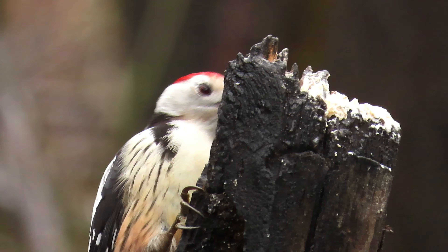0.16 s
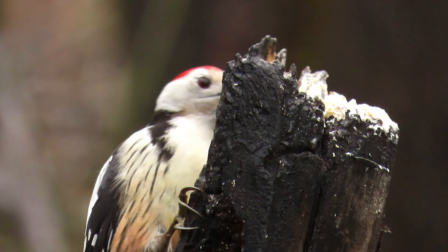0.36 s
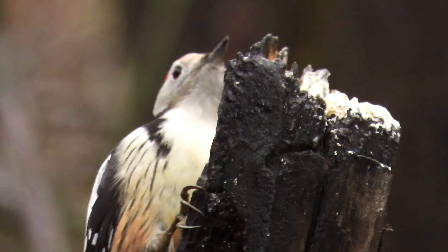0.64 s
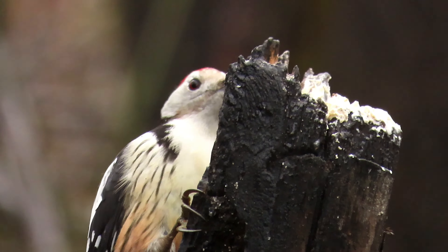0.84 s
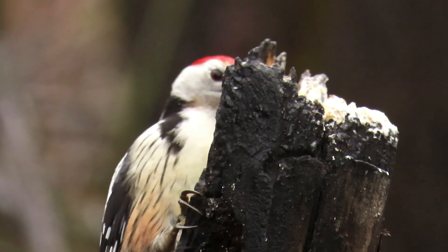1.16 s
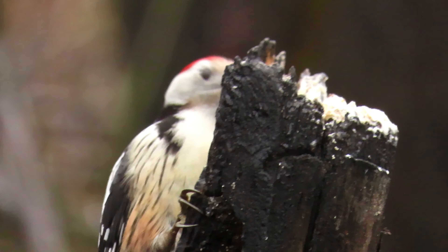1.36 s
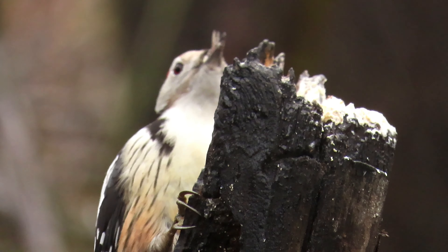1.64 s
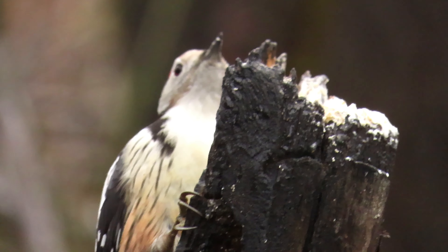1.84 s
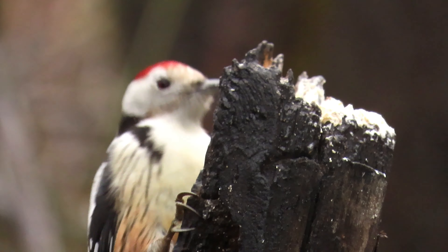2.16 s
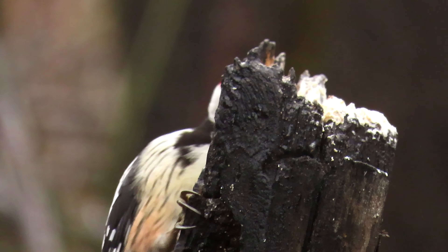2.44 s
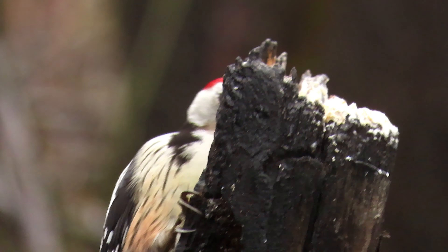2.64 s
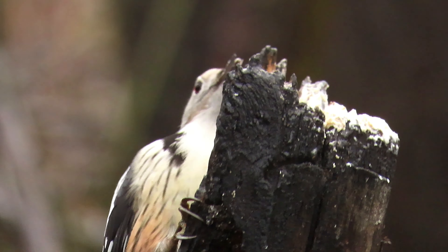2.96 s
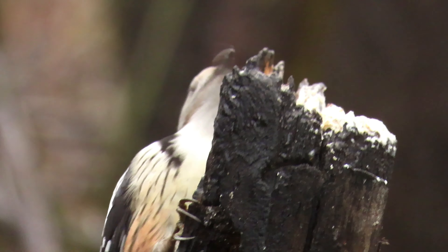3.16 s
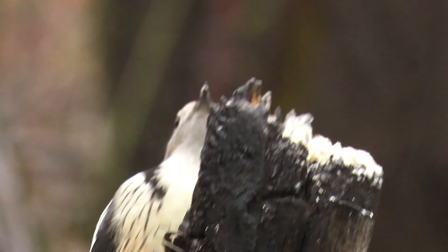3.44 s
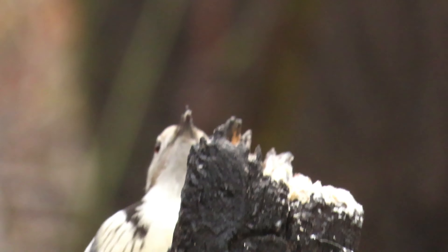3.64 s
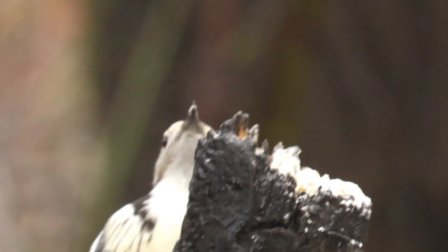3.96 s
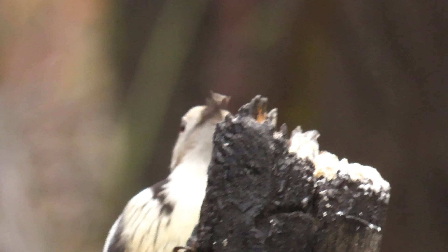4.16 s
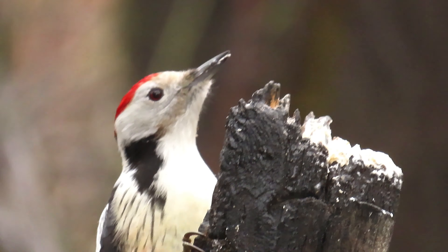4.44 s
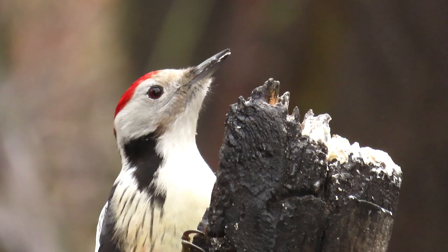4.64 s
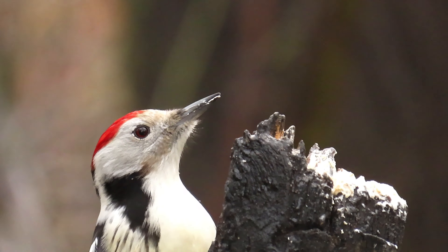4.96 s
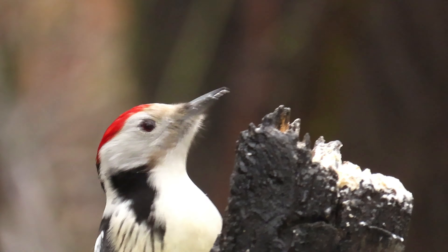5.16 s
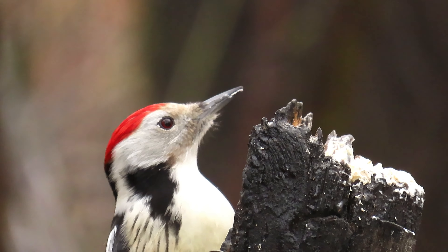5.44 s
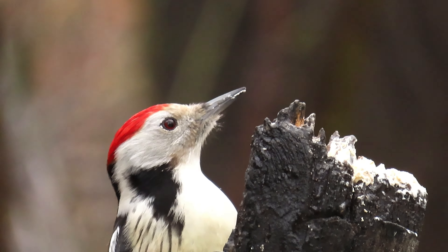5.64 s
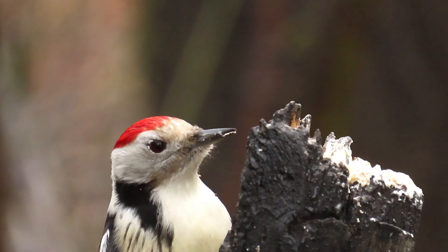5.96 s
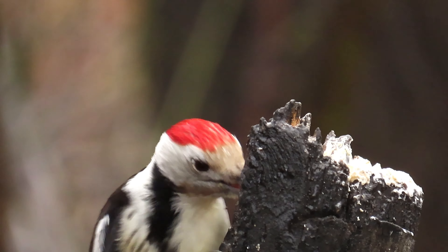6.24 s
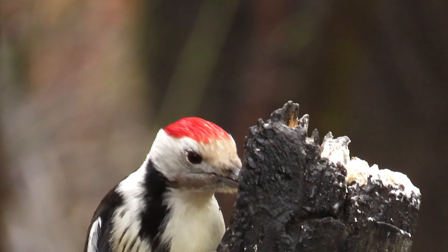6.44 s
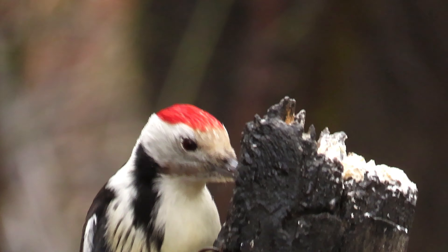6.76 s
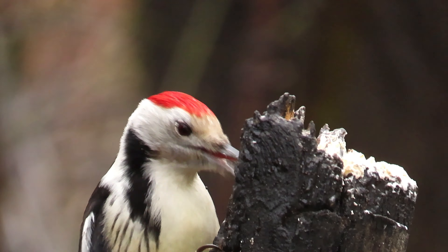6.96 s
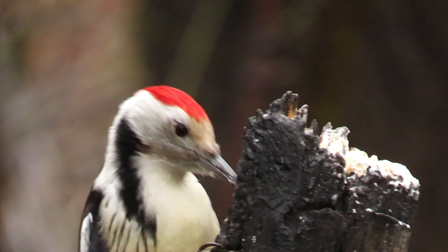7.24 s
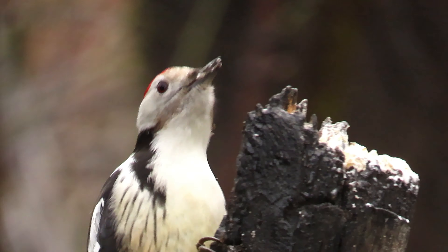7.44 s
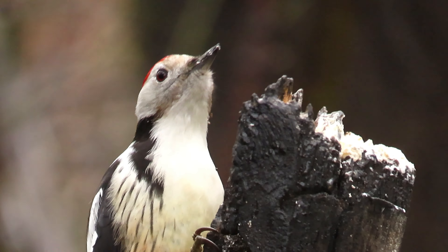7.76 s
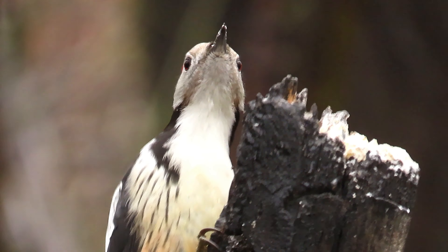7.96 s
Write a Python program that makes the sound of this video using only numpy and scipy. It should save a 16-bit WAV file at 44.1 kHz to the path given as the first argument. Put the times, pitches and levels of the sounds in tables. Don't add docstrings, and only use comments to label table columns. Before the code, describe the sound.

A woodpecker gives fifteen quick, even, nasal whistled calls, loud and slightly overdriven, echoing through hushed woodland, then faint birds and small wooden knocks.

```python
import sys
import numpy as np
from scipy import signal
from scipy.io import wavfile
from scipy.ndimage import uniform_filter1d, map_coordinates

SR = 44100
rng = np.random.default_rng(int(sys.argv[2]) if len(sys.argv) > 2 else 0)


def file_out(sig):
    cols = np.atleast_2d(sig).T
    lim = np.clip(cols, -1, 1)
    pcm = np.round(lim * 32767).astype(np.int16)
    wavfile.write(sys.argv[1], SR, pcm)


def field_ratio(decibels):
    return 10 ** (np.asarray(decibels, dtype=float) / 20)


N = 356769


def evened(x):
    return x / np.sqrt(np.mean(x ** 2) + 1e-20)


def read(points, hz):
    f, value = np.transpose(points)
    return np.interp(np.log(hz + 1), np.log(f + 1), value)


def add(mix, s, sound):
    part = mix[round(s * SR):][:len(sound)]
    part += sound[:len(part)]


def drift(n, size):
    smooth = uniform_filter1d(rng.standard_normal(n), size)
    return evened(uniform_filter1d(smooth, size))


def resonate(x, hz, width):
    turn = np.exp(2j * np.pi * hz * np.arange(len(x)) / SR)
    r = np.exp(-np.pi * width / SR)
    smooth = signal.lfilter([1 - r], [1, -r], x / turn + 1e-18)
    return 2 * (turn * smooth).real


# (frequency [Hz], level per Hz [dB])
HUSH_COLOUR = [(15, -37), (25, -4.5), (64, -0.5), (184, -7.5), (333, -9), (437, -12.5), (486, -10.5),
               (604, -14), (1040, -14), (1150, -18.5), (2030, -19.5), (4950, -24), (6490, -27),
               (14200, -32), (15800, -35)]
# (frequency [Hz], likeness [-1 to 1])
HUSH_LIKENESS = [(30, 0.93), (60, 0.99), (110, 0.94), (200, 0.3), (380, 0.024), (700, .6), (2400, 0.61),
                 (6000, 0.72), (15000, 0.63)]
# (time [s], level [dB])
GUSTS = [(0.0, -65), (4.3, -63), (4.62, -62.5), (5.02, -62.5), (5.93, -63.5), (6.83, -63.5), (8.09, -65.5)]


def hush():
    frames, hz = N // 512 + 5, np.fft.rfftfreq(2048, 1 / SR)
    a, b, c, d, patches = rng.standard_normal((frames, len(hz), 5)).T
    patches = uniform_filter1d(patches, size=24, axis=0)
    patches = evened(uniform_filter1d(patches, size=8, axis=1))
    s, gust_db = np.transpose(GUSTS)
    gust_db = np.interp(np.arange(frames) * 512 / SR, s, gust_db - gust_db.mean())
    gust_db = gust_db + drift(frames, size=5)
    treble = np.clip(hz / 9000, 0, 1)[:, None]
    same = np.clip(read(HUSH_LIKENESS, hz), -1, 1)[:, None]
    left = a + 1j * b
    right = same * left + np.sqrt(1 - same ** 2) * (c + 1j * d)
    level_db = read(HUSH_COLOUR, hz)[:, None] + 1.43 * patches + treble * gust_db
    z = np.array([left, right]) * field_ratio(level_db)
    noise = signal.istft(z, nperseg=2048, noverlap=1536)[1][:, :N]
    return field_ratio(-46) * evened(noise)


# (frequency [Hz], time to fall 60 dB [s])
TRUNKS = [(500, 1), (2000, 1.4), (2800, 1.5), (5500, 0.36), (9000, 0.56)]
# (delay [s], spread [s], level against the first scatter [dB])
SLOPES = [(.5, .2, -14), (.97, .04, -11), (1.22, .05, -14), (1.43, .05, -12)]


def trunks(x, same):
    a, b = rng.standard_normal((2, 2 * SR))
    same = np.clip(same, 0, 1)
    hz, t, z = signal.stft([a, same * a + np.sqrt(1 - same ** 2) * b], SR, nperseg=256)
    late = sum(field_ratio(db) * np.exp(-((t - s) / spread) ** 2) for s, spread, db in SLOPES)
    fading = field_ratio(-60 * t / read(TRUNKS, hz)[:, None])
    dull = field_ratio(-3 * hz[:, None] / 1000 + 2.5)
    tail = signal.istft(z * (fading + late * dull), SR, nperseg=256)[1]
    tail = signal.lfilter([1, -0.5], [1], tail)
    tail *= np.clip(np.arange(tail.shape[1]) / SR / 0.014, 0, 1)
    sway_db = 2.0 * drift(N, size=600)
    echoes = signal.fftconvolve(x[None], tail / np.linalg.norm(tail[0]), axes=1)[:, :N]
    return field_ratio(sway_db) * echoes


# (start [s], end [s], level [dB])
CAWS = [
    (0.239, 0.62, -56.5),
    (6.932, 7.303, -55),
]
# (frequency [Hz], width [Hz], level [dB])
CAW_THROAT = [(1070, 30, 4), (1246, 45, 4.5), (1500, 54, -19)]


def crow():
    out = np.zeros(N)
    for start, end, db in CAWS:
        n = round((end - start) * SR)
        drive = rng.standard_normal(n) * field_ratio(4.9 * drift(n, size=350))
        throat = sum(field_ratio(d) * evened(resonate(drive, f, w)) for f, w, d in CAW_THROAT)
        add(out, start, field_ratio(db) * evened(throat) * signal.windows.tukey(n, 0.3))
    return out


# (time [s], pitch [Hz], level [dB])
SONG = [
    [(5.845, 5770, -60), (5.875, 5120, -46), (5.893, 5000, -44), (5.9, 4950, -62), (5.92, 4430, -48),
     (5.93, 4450, -54), (5.948, 3870, -57)],
    [(5.968, 2050, -60), (5.99, 3200, -44), (6.007, 3650, -44), (6.02, 3650, -48), (6.04, 3590, -56)],
    [(6.6, 5500, -63), (6.63, 5000, -64), (6.66, 4500, -58), (6.688, 4520, -60), (6.705, 3950, -56)],
    [(6.714, 4280, -44), (6.72, 4420, -49.5), (6.732, 4950, -56), (6.762, 5250, -60)],
    [(.61, 1930, -61), (.635, 1960, -59), (.665, 1960, -58)],
    [(1.04, 1145, -54), (1.12, 1130, -58.5), (1.18, 1157, -57)],
    [(4.13, 1500, -56), (4.165, 1590, -51), (4.2, 1500, -65), (4.24, 1610, -52), (4.27, 1530, -65)],
]


def songbird():
    out = np.zeros(N)
    for rows in SONG:
        s, hz, db = np.transpose(rows)
        t = np.arange(s[0], s[-1], 1 / SR)
        pitch = np.interp(t, s, hz) * (1 + 0.012 * drift(len(t), size=80))
        tone = np.sin(2 * np.pi * np.cumsum(pitch) / SR)
        level = field_ratio(np.interp(t, s, db) + 0.61 * drift(len(t), size=120))
        add(out, s[0], np.sqrt(2) * level * tone * signal.windows.tukey(len(t), 0.1))
    return out


# (time [s], level [dB], frequency [Hz], time to fall 60 dB [s])
KNOCKS = [(6.16, -33.5, 1010, 0.026), (6.575, -38.5, 75, 0.13), (6.64, -39, 160, 0.096),
          (6.746, -32, 332, 0.044), (6.748, -40, 210, .05), (6.805, -36, 310, .05),
          (7.194, -39, 327, 0.066), (7.6, -37, 200, 0.036), (7.645, -35.5, 300, 0.085),
          (7.692, -29.5, 260, 0.026), (7.78, -39, 340, 0.057)]
# (time [s], level [dB], time to fall 60 dB [s])
TICKS = [
    (4.8814, -31, .0045),
]
# (frequency [Hz], level [dB])
TICK_MODES = [(1550, -2), (3100, -12), (5600, 0), (7600, -9), (9800, 2)]


def knocks():
    out, t = np.zeros(N), np.arange(6000) / SR
    for s, db, hz, t60 in KNOCKS:
        soft_start = 1 - np.exp(-t / 0.0021)
        add(out, s, field_ratio(db - 60 * t / t60) * np.sin(2 * np.pi * hz * t) * soft_start)
    for s, db, t60 in TICKS:
        ring = sum(field_ratio(d) * np.sin(2 * np.pi * f * t) for f, d in TICK_MODES)
        add(out, s, field_ratio(db - 60 * t / t60) * ring)
    return out


def catch(s, length, hz, db):
    t = np.arange(0, length + 0.0014, 1 / SR)
    phase = 2 * np.pi * (0.93 * hz * t + 14000 * t ** 2)
    tone = np.cos(phase) + field_ratio(-19) * np.cos(2 * phase) + field_ratio(-16) * np.cos(3 * phase)
    air = resonate(rng.standard_normal(len(t)), 3400, 3000)
    puff = field_ratio(-18) * evened(resonate(air, 3100, 3000))
    return s, field_ratio(db + 3) * (tone + puff) * np.hanning(len(t)) ** 0.27


# (pitch [Hz], level [dB])
WINDPIPE = [(1000, -32), (1150, -15), (1300, -11.5), (1400, -9.5), (1480, -13)]
# (pitch [Hz], level [dB])
LOW_PIPE = [(1100, 1.5), (1290, 1.5), (1400, -4.5), (1500, -6.5)]
RISE_BEND = 0.722
HOOK_HZ, HOOK_S = 55, 0.0037
SNAP_HZ, SNAP_DB, SNAP_S = 110, -6, 0.0025


def opening(start, end, first_hz, last_hz, db):
    s = np.linspace(start, end, num=24)
    done = (s - start) / (end - start)
    snap = np.exp((start - s) / SNAP_S)
    hz = first_hz + (last_hz - first_hz) * done ** RISE_BEND
    hz = hz + HOOK_HZ * np.exp((s - end) / HOOK_S)
    hz = hz + SNAP_HZ * (0.5 - snap) * (1 - done)
    second_db = db + SNAP_DB * snap + read(LOW_PIPE, hz)
    return np.transpose([s, hz, second_db + read(WINDPIPE, hz), second_db])


def closing(start, end, db):
    s = np.linspace(start, end, num=8)
    sunk = np.minimum((s - start) / 0.01166, 1)
    hz = 1270 - 274 * sunk
    second_db = db - 10 * sunk
    return np.transpose([s, hz, second_db + read(WINDPIPE, hz) + 8.5, second_db])


def bridge(s, low_hz):
    return [(s - 0.006, low_hz, -41.5, -52), (s, 1755, -29.5, -50)]


def strained(knee_hz):
    return np.clip((knee_hz - 1980) / 120, 0, 1)


# (pitch [Hz], level [dB])
WHISTLE_PIPE = [(1550, -8), (1700, -1), (1850, 0.24), (2000, -1.5), (2140, -3), (2700, -8.5)]
# (pitch [Hz], level [dB])
WHISTLE_SECOND = [(1600, -36.5), (1750, -42), (1850, -38), (1910, -28.5), (2000, -22.5), (2130, -20),
                  (2700, -16)]
HIGH_HZ, BACK_HZ = 2400, 1793
HIGH_ARCH_HZ, HIGH_ARCH_DB = 94.3, 4.5
FALL_BEND, STRAINED_BEND = 1.47, -0.616
SWELL_DB, KNEE_DB, KNEE_S = -4, -4, 0.0029
ATTACK_DB, ATTACK_S = -4.5, 0.004
RELEASE_DB, RELEASE_S, STRAINED_DB, STRAINED_S = -4.5, 0.0076, -4, 0.0071


def whistle(start, last_hz, knee, end, first_hz, knee_hz, db):
    s = np.linspace(start, end, num=80)
    held = np.clip((s - start) / (knee - start), 0, 1)
    fallen = np.clip((s - knee) / (end - knee), 0, 1)
    high, strain = knee_hz > HIGH_HZ, strained(knee_hz)
    arch = high * np.sqrt(np.sin(np.pi * held).clip(0))
    top_hz = BACK_HZ if high else knee_hz
    held_hz = first_hz + (knee_hz - first_hz) * held + HIGH_ARCH_HZ * arch
    fall_hz = top_hz + (last_hz - top_hz) * fallen ** (FALL_BEND + STRAINED_BEND * strain)
    hz = np.where(s < knee, held_hz, fall_hz)
    falter = np.exp(-((s - knee) / KNEE_S) ** 2)
    shape_db = strain * (SWELL_DB * (1 - held) ** 2 + KNEE_DB * falter)
    shape_db = shape_db + (1 - strain) * ATTACK_DB * np.maximum(1 - (s - start) / ATTACK_S, 0)
    shape_db = shape_db + HIGH_ARCH_DB * arch
    left = (end - s) / (RELEASE_S + STRAINED_S * strain)
    release_db = (RELEASE_DB + STRAINED_DB * strain) * np.maximum(1 - left, 0)
    first_db = db + shape_db + release_db + read(WHISTLE_PIPE, hz)
    return np.transpose([s, hz, first_db, db + read(WHISTLE_SECOND, hz)])


# (frequency [Hz], level [dB])
BEAK = [(3450, -9), (3900, 1.5), (4250, 5.5), (4700, -6.5), (5500, 1.5)]


def note(rows, upper, waver, shimmer_db, airy_db):
    s, *columns = np.transpose(rows)
    edge = 0.0011
    t = np.arange(s[0] - edge, s[-1] + edge, 1 / SR)
    hz, first_db, second_db = (np.interp(t, s, c) for c in columns)
    phase = 2 * np.pi * np.cumsum(hz * (1 + waver * drift(len(t), size=30))) / SR
    sound = field_ratio(first_db) * np.cos(phase) + field_ratio(second_db) * np.cos(2 * phase + 3.4)
    for k, db in upper:
        beak_db = read(BEAK, k * hz) - 5 * np.maximum(k * hz - 6100, 0) / 1000
        sound += field_ratio(second_db + db + beak_db) * np.cos(round(k) * phase + k)
    air = resonate(rng.standard_normal(len(t)), 2500, 1800)
    air = resonate(air, 2500, 1800)
    sound += field_ratio(np.maximum(first_db, second_db) + airy_db) * evened(air)
    to_edge = np.minimum(t - t[0], t[-1] - t) / (2 * edge)
    fade = np.sin(np.pi / 2 * np.clip(to_edge, 0, 1)) ** 2
    return t[0], np.sqrt(2) * sound * fade * field_ratio(shimmer_db * drift(len(t), size=60))


# (start [s], break [s], first pitch [Hz], last pitch [Hz], second harmonic level [dB])
OPENINGS = [(0.789, 0.839, 1117, 1500, -31), (0.985, 1.014, 1188, 1457, -30),
            (1.183, 1.205, 1167, 1480, -28.5), (1.384, 1.411, 1160, 1455, -30.5),
            (1.584, 1.609, 1115, 1460, -29.5), (1.789, 1.823, 1226, 1424, -29.5),
            (1.998, 2.032, 1238, 1427, -29.5), (2.21, 2.248, 1158, 1394, -30.5),
            (2.424, 2.462, 1173, 1415, -29.5), (2.642, 2.686, 1187, 1403, -30),
            (2.866, 2.906, 1155, 1396, -29.5), (3.091, 3.134, 1146, 1402, -29),
            (3.315, 3.356, 1117, 1405, -27.5), (3.546, 3.587, 1119, 1355, -29),
            (3.763, 3.803, 1096, 1355, -29.5)]
# (knee [s], end [s], first pitch [Hz], knee pitch [Hz], effort [dB])
WHISTLES = [(0.874, 0.902, 2110, 2062, -22), (1.065, 1.095, 2075, 2158, -20),
            (1.26, 1.293, 2065, 2124, -20), (1.461, 1.494, 2050, 2066, -21.5),
            (1.66, 1.694, 2025, 1981, -20), (1.87, 1.898, 1988, 1970, -20.5),
            (2.076, 2.105, 1964, 1958, -19), (2.309, 2.326, 2664, 2640, -18.5),
            (2.498, 2.529, 1920, 1904, -19), (2.724, 2.747, 1924, 1897, -17.5),
            (2.946, 2.972, 1920, 1886, -18), (3.167, 3.198, 1944, 1890, -18),
            (3.388, 3.413, 1907, 1896, -18.5), (3.604, 3.639, 1865, 1853, -19),
            (3.826, 3.853, 1844, 1812, -19)]
# (end [s], pitch where the whistle gives way [Hz], second harmonic level [dB])
CLOSINGS = [(.914, 1533, -41), (1.106, 1640, -46), (1.313, 1710, -43.5), (1.503, 1640, -45),
            (1.716, 1645, -37.5), (1.919, 1598, -41), (2.116, 1540, -39.5), (2.332, 1554, -35),
            (2.545, 1535, -33), (2.766, 1588, -35.5), (2.984, 1545, -31.5), (3.215, 1570, -32.5),
            (3.435, 1554, -32), (3.656, 1542, -33.5), (3.863, 1553, -33.5)]
# (multiple of the pitch [-], level [dB])
LOW_UPPER = [(3, -15), (4, -26.5)]
WHISTLE_UPPER = [(3, -17), (4, -8), (5, -30)]
# (start [s], end [s], pitch [Hz], level [dB])
LINGERS = [(1.198, 1.227, 2630, -41), (1.412, 1.432, 2600, -40), (1.615, 1.644, 2550, -40),
           (1.817, 1.854, 2540, -40)]
# (delay [s], level [dB])
STUMP = [(.0021, -22), (.0093, -22.5)]
# (shift [s], length [s], pitch [Hz], level [dB], gain over the scene [dB/s])
CATCH_IN = (-0.0042, 0.0045, 1960, -39.5, 3.6)
CATCH_OUT = (0.008, 0.005, 1810, -46, 2.5)
TIRING_S, TIRING_DB_PER_S = 2.4, -4.5


def woodpecker():
    out = np.zeros(N)
    for k, (low, high, (end, last_hz, db)) in enumerate(zip(OPENINGS, WHISTLES, CLOSINGS)):
        tired_db = TIRING_DB_PER_S * max(low[0] - TIRING_S, 0)
        upper = [(m, d + tired_db) for m, d in LOW_UPPER]
        early = 0.0038 * strained(high[3]) * (high[3] < HIGH_HZ)
        rising = opening(low[0], low[1] - early, *low[2:])
        for rows in rising, bridge(low[1], low[3]), closing(high[1], end, db):
            add(out, *note(rows, upper, waver=0.016, shimmer_db=1.0, airy_db=-44))
        rows = whistle(low[1], last_hz, *high)
        add(out, *note(rows, WHISTLE_UPPER, waver=0.0046, shimmer_db=0.8, airy_db=-37))
        crackle = resonate(rng.standard_normal(260), 3200, 4500)
        crackle = resonate(crackle, 3200, 4500)
        add(out, low[1] - 0.004, field_ratio(-42.5) * evened(crackle) * np.hanning(260))
        if k > 0:
            for s, (shift, length, hz, catch_db, gain) in [(low[0], CATCH_IN), (high[1], CATCH_OUT)]:
                add(out, *catch(s + shift, length, hz, catch_db + gain * s))
    for start, end, hz, db in LINGERS:
        rows = [(start, hz, db, -70), ((start + end) / 2, hz, db, -70), (end, hz, db - 5.5, -70)]
        add(out, *note(rows, [], waver=0.006, shimmer_db=0.0, airy_db=-32))
    direct = out.copy()
    for delay, db in STUMP:
        add(out, delay, field_ratio(db) * direct)
    return out


# (time [s], lag of the right port [microseconds])
LAG = [(0.0, 56), (0.3, 61), (0.8, 55), (1.4, 63), (1.6, 48), (2.0, 34), (2.4, 51), (2.7, 80), (3.1, 80),
       (3.4, 62), (4.5, 47), (4.8, 52), (5.05, 76), (5.2, 74), (6.0, 37), (6.25, 51), (7.0, 51), (7.8, 77)]


def scene():
    bird, far = woodpecker(), songbird() + crow()
    hollow = resonate(bird, 2820, 160)
    near = bird + field_ratio(-25) * trunks(bird + hollow, same=0.99)
    left, right = near * field_ratio([[0], [2.9]])
    around = hush() + far + field_ratio(-10.5) * trunks(far, same=0.82) + knocks()
    s, lag = np.transpose(LAG)
    late = np.arange(N) - np.interp(np.arange(N) / SR, s, lag) * SR / 10 ** 6
    right = map_coordinates(right + field_ratio(0.45) * around[1], [late], order=5, mode="nearest")
    return np.array([left + around[0], right])


def low_pass(x):
    return signal.sosfilt(signal.butter(12, 16000, fs=SR, output="sos"), x)


def record(dry):
    ceiling, lift = 0.15, 0.12
    fine = signal.resample_poly(dry, 2, 1, axis=1)
    flat = signal.resample_poly(np.clip(fine, -ceiling, ceiling), 1, 2, axis=1)
    bright = signal.lfilter([1 + lift, -lift], [1], flat)
    edge = signal.firwin(511, 15870, window=("kaiser", 9), fs=SR)
    mix = signal.oaconvolve(bright, edge[None], "same")
    return low_pass(mix)


dry = scene()
out = record(dry)
file_out(out)
```